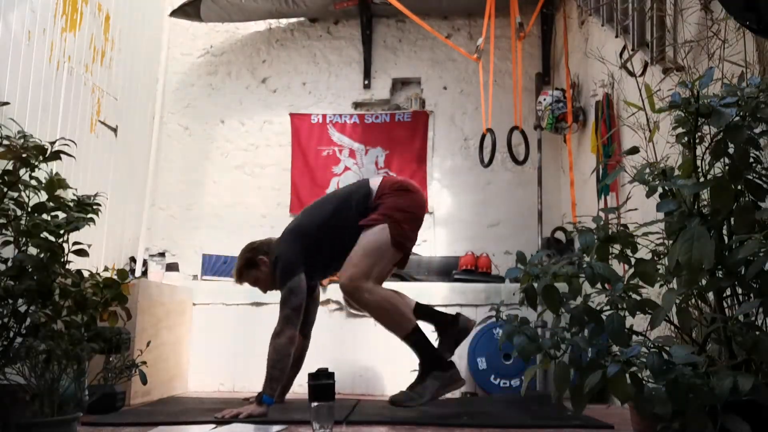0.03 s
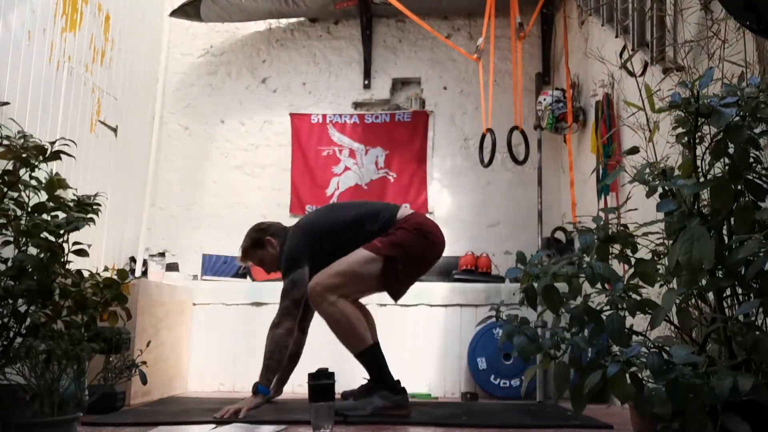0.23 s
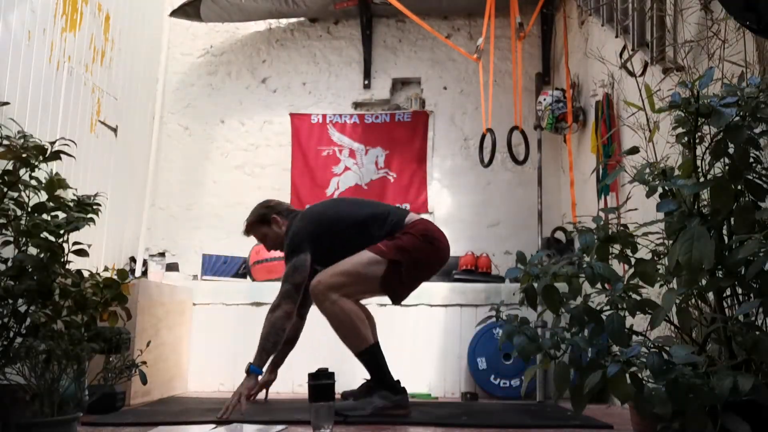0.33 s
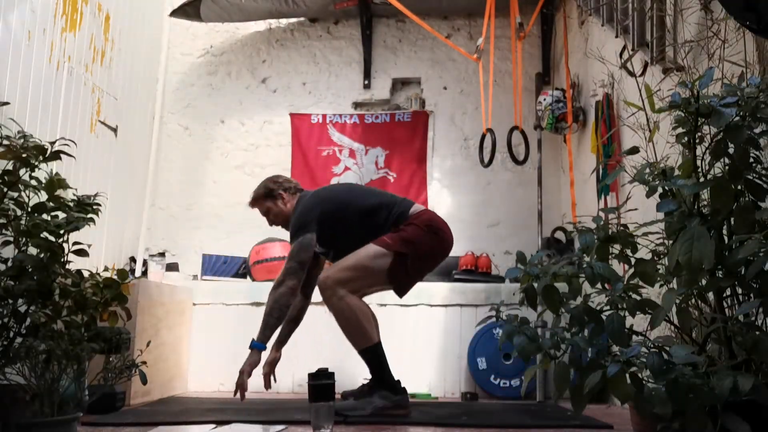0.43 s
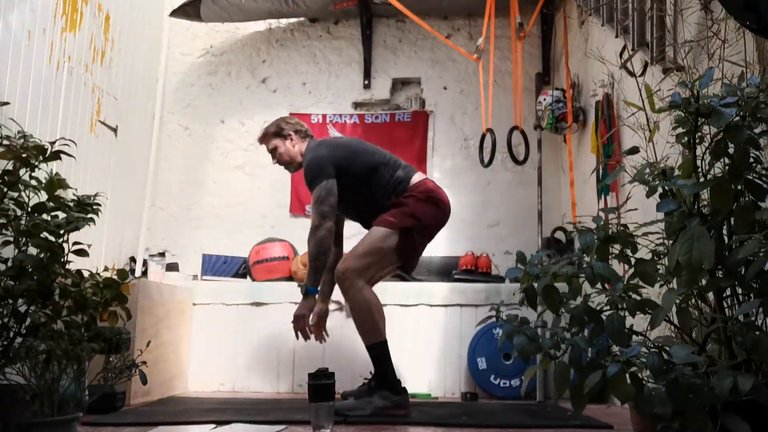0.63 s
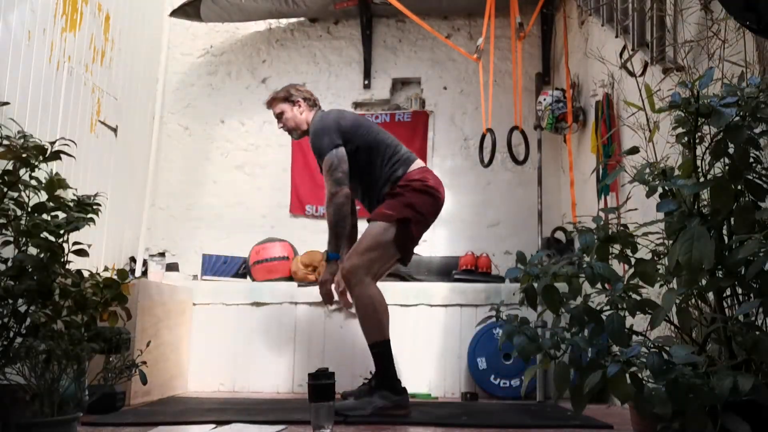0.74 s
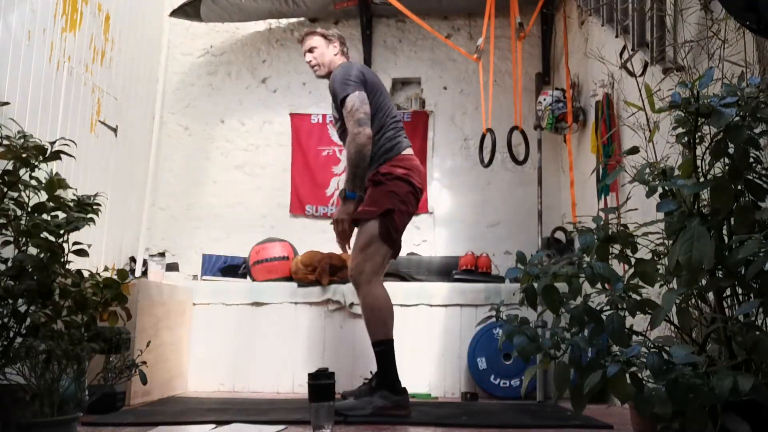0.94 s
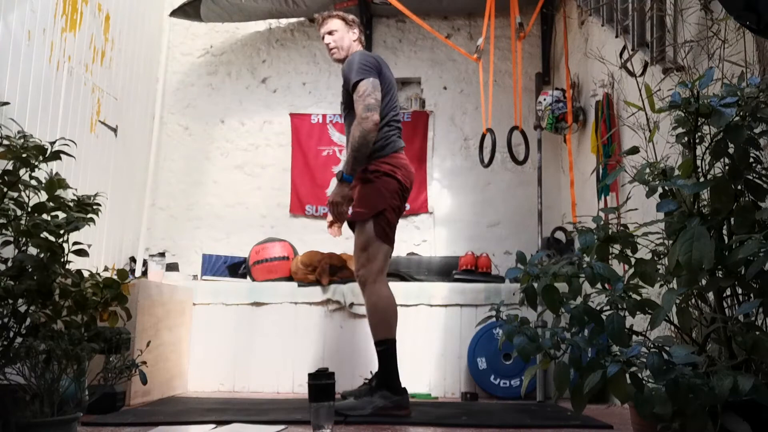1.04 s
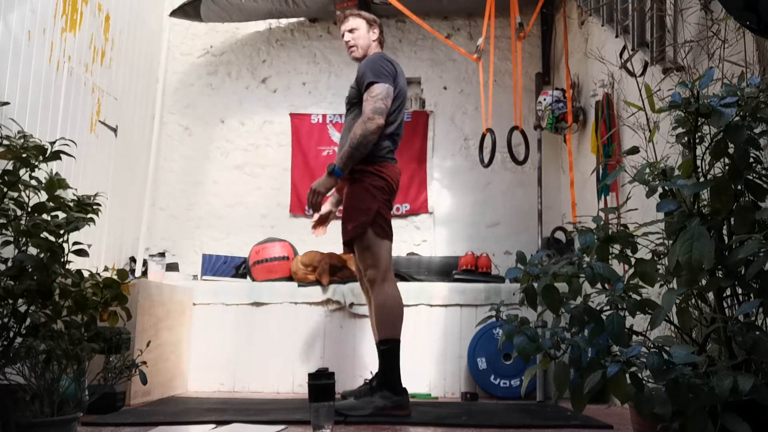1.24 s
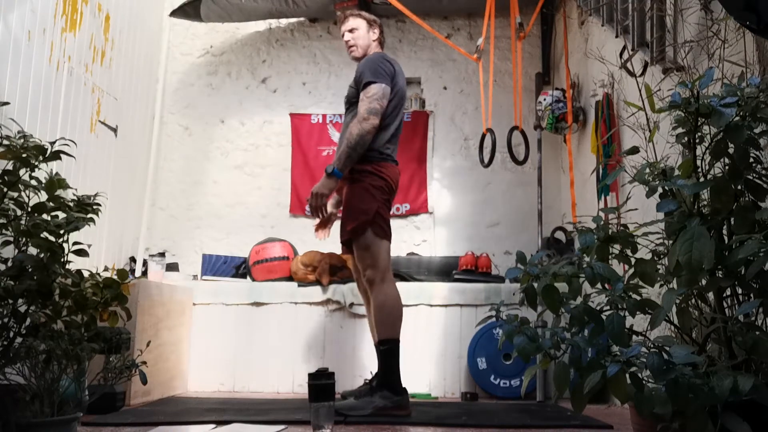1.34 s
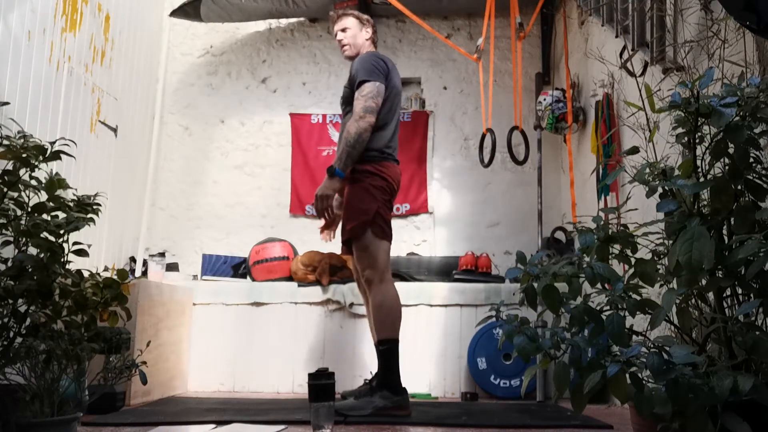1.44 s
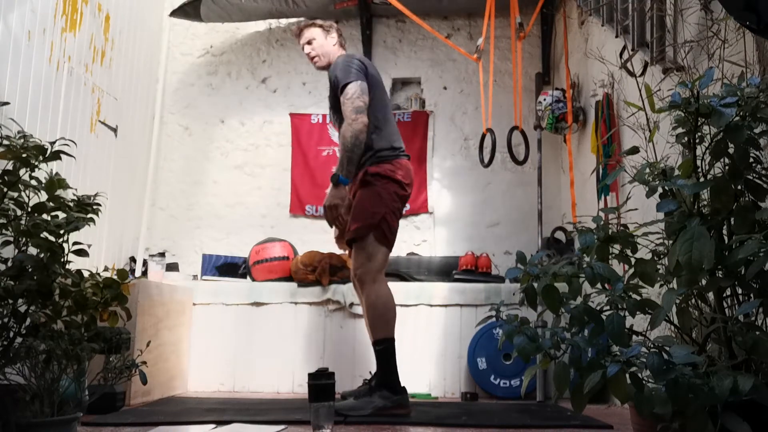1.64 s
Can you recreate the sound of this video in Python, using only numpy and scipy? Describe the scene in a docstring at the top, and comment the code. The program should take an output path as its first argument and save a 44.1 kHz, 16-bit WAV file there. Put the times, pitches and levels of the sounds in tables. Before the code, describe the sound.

Two shoes landing on a padded mat. A soft scuff and very faint taps open the first 0.1 s; at about 0.22 s the soles slap down in a rapid, uneven cluster with gritty scuffing, and heel weight booms low through the floor near 0.3 s. The hard-walled yard rings about a third of a second. A barely audible scuff follows near 0.46 s, then only faint distant rumble, hiss and thin hum.

```python
"""Faint rumble, hiss and hum with a soft scuff, then two shoes land on a padded mat in a hard-walled yard room.
Light first contacts lead to sole slaps: a strike and a roll of small contacts, coloured by rubber, foam and mat.
Heels load the floor, whose decaying sine modes boom; soles scuff as filtered noise and grains.
A phone with two unlike microphones listens: the left one is dull above 8 kHz."""
import sys
import numpy as np
from scipy import signal
from scipy.fft import rfft, irfft, next_fast_len
from scipy.io import wavfile
from scipy.ndimage import uniform_filter1d

SR = 44100
rng = np.random.default_rng(int(sys.argv[2]) if len(sys.argv) > 2 else 0)


def persist_wave(psi):
    """Save psi, clipped to +-1, as 16-bit WAV."""
    counts = np.round(np.clip(psi, -1, 1) * 32767).astype(np.int16)
    wavfile.write(sys.argv[1], SR, np.atleast_2d(counts).T)


def undo_db(level):
    """Turn decibels back into plain size, where 20 dB means ten times bigger."""
    steps = np.asarray(level, float) / 20
    return 10 ** steps


N = 74970


def unit(x):
    """Scaled to rms 1."""
    return x / np.sqrt(np.mean(x ** 2) + 1e-20)


def along(points, hz):
    """Interpolates (Hz, value) points on a log frequency axis."""
    f, v = np.transpose(points)
    return np.interp(np.log(hz + 1), np.log(f + 1), v)


def filtered(x, response):
    """x times a response of frequency, zero-padded."""
    m = 2 * next_fast_len(x.shape[-1] // 2 + 4096)
    hz = np.fft.rfftfreq(m, 1 / SR)
    return irfft(rfft(x, m) * response(hz), m)[..., :x.shape[-1]]


def causal(db):
    """Minimum-phase response with these levels, by folding the cepstrum."""
    cepstrum = irfft(db * np.log(10) / 20)
    half = len(cepstrum) // 2
    fold = np.r_[1, np.full(half - 1, 2), 1, np.zeros(half - 1)]
    return np.exp(rfft(cepstrum * fold))


# left-right likeness: (frequency [Hz], correlation [0-1])
LIKENESS = [(60, 0.99), (130, 0.98), (290, 0.87), (640, 0.63), (1400, 0.19), (15000, .01)]


def at_ports(pair):
    """Two unrelated signals become left and right, alike in the bass only."""
    def mix(hz):
        angle = np.arccos(np.clip(along(LIKENESS, hz), -1, 1)) / 2
        return np.array([np.cos(angle), np.sin(angle)])
    common, opposed = filtered(pair, mix)
    return np.array([common + opposed, common - opposed])


def grains(shape, per_s, spread_db):
    """Sparse random clicks of uneven size."""
    hit = rng.random(shape) < per_s / SR
    size_db = spread_db * rng.exponential(size=shape)
    return hit * undo_db(size_db) * rng.standard_normal(shape)


# distant rumble spectrum: (frequency [Hz], relative density [dB per Hz])
RUMBLE_SPECTRUM = [(12, -48), (20, -19), (45, -17), (62, -9), (81, 0), (139, -13), (300, -13), (325, -18.5),
                   (440, -20), (640, -26), (740, -21), (810, -24), (980, -34), (1510, -33), (2400, -40),
                   (3300, -56), (5500, -120)]
RUMBLE_DB, PATCHY_DB = -56, -1.24


def rumble():
    """Distant rumble: noise whose level wanders in random patches of time and frequency."""
    z = signal.stft(rng.standard_normal((2, N + 1024)), nperseg=1024)[2]
    field = rng.standard_normal(z.shape[1:])
    for axis in (0, 1):
        field = uniform_filter1d(field, size=8, axis=axis)
    pair = signal.istft(z * undo_db(PATCHY_DB * unit(field)), nperseg=1024)[1][:, :N]
    return undo_db(RUMBLE_DB) * unit(filtered(at_ports(pair), lambda hz: undo_db(along(RUMBLE_SPECTRUM, hz))))


# faint hiss spectrum: (frequency [Hz], relative density [dB per Hz])
HISS_SPECTRUM = [(1470, -30), (2500, 0), (3350, -6), (3610, -6), (3750, -8), (4150, -6), (5340, -5),
                 (7610, -14), (8090, -8), (8870, -10), (10700, -4), (11700, -7), (15600, -12)]
HISS_DB = -75.99


def hiss():
    """Steady filtered noise, independent at each microphone."""
    noise = rng.standard_normal((2, N))
    return undo_db(HISS_DB) * unit(filtered(noise, lambda hz: undo_db(along(HISS_SPECTRUM, hz))))


HUM_HZ, HUM_WIDTH_HZ, HUM_DB = 722, 12, -79.5  # width at half amplitude


def hum():
    """A faint fuzzy tone: noise through one narrow resonance."""
    line = lambda hz: 1 / (1 + (2 * (hz - HUM_HZ) / HUM_WIDTH_HZ) ** 2)
    return undo_db(HUM_DB) * unit(filtered(at_ports(rng.standard_normal((2, N))), line))


# sliding soles: (start [s], length [s], level before sag [dB])
SCUFF_SLIDES = [(-0.01, 0.22, -52.5), (0.216, 0.16, -44.5), (0.461, 0.17, -70.5)]
# grit spectrum: (frequency [Hz], relative density [dB per Hz])
GRIT_SPECTRUM = [(1500, -4.5), (3000, -6), (5500, -11), (7000, -5.5), (7800, -10), (8800, -3), (9800, -7),
                 (10700, -5), (12000, -10.5), (15500, -16.5)]
SCUFF_RISE_S, SCUFF_T60_S, SCUFF_SAG_DB = 0.006, 0.2, 11
GRAINS_PER_S, GRAIN_SPREAD_DB, GRAIN_SHARE = 2800, 7.0, 0.83  # share: rms over smooth noise


def scuffs():
    """Dense grit under a sliding sole: quick rise, slow sag, release when it stops."""
    t = np.arange(N) / SR
    shape = np.zeros(N)
    for s, length, db in SCUFF_SLIDES:
        rise = np.clip((t - s) / SCUFF_RISE_S, 0, 1)
        sag_db = SCUFF_SAG_DB * np.clip((t - s) / length, 0, 1)
        release_db = 60 * np.maximum(t - s - length, 0) / SCUFF_T60_S
        shape += rise * undo_db(db - sag_db - release_db)
    clicks = unit(grains((2, N), GRAINS_PER_S, GRAIN_SPREAD_DB))
    grit = rng.standard_normal((2, N)) + GRAIN_SHARE * clicks
    return shape * unit(filtered(grit, lambda hz: undo_db(along(GRIT_SPECTRUM, hz))))


# reverberation: (frequency [Hz], t60 [s])
WALL_DECAY = [(100, 0.68), (250, 0.25), (500, 0.29), (1000, 0.33), (2000, 0.34), (5000, 0.35),
              (12000, 0.054)]
WET_DB = -1  # tail over direct sound


def walls(x):
    """Direct sound plus a fresh noise tail in which each frequency dies at its own speed."""
    hz, t, z = signal.stft(rng.standard_normal((2, SR // 2)), SR, nperseg=256)
    decay = undo_db(-60 * t / along(WALL_DECAY, hz)[:, None])
    tail = at_ports(signal.istft(z * decay, SR, nperseg=256)[1])
    tail = undo_db(WET_DB) * tail / np.linalg.norm(tail[0])
    direct = np.arange(tail.shape[1]) == 0
    return signal.fftconvolve(x, tail + direct, axes=1)


def add(out, sound, s):
    """Mixes a sound in at time s."""
    part = out[:, max(round(s * SR), 0):][:, :sound.shape[-1]]
    part += sound[..., :part.shape[-1]]


# sole contacts: (time [s], strength before SLAP_GAIN_DB [dB],
# dullness above 1 kHz [dB per octave], fullness below 1 kHz [dB per octave])
SOLE_CONTACTS = [(0.0, -50.5, 4, 7.5), (0.0207, -37.5, 5.5, -1), (0.037, -46.5, 20.5, 7),
                 (0.056, -48, 20, -4), (0.075, -43.5, 14, -9.5), (0.2228, -20, 1, -2.5),
                 (0.2255, -16, 0, -2.5), (0.2335, -16.5, 0, -2.5), (0.243, -23.5, 3.5, 0),
                 (0.254, -23, -1, -2), (0.268, -34.5, 2, 0.5), (0.279, -24.5, 4.5, -2),
                 (0.288, -23.5, 1, 4.5)]
# rubber on foam: (frequency [Hz], relative density [dB per Hz])
SOLE_SPECTRUM = [(53, -31), (90, -15), (264, -8.5), (463, -5), (538, -1), (922, -7), (1610, -13.5),
                 (1760, -21.5), (2710, -18), (3080, -28), (5000, -32.5), (9050, -48.5), (15500, -46)]
# mat and wall resonances: (frequency before shift [Hz], width at half lift [Hz], lift [dB])
MAT_RESONANCES = [(270, 43, 4.5), (517, 34, 2.5), (613.4, 30, 3), (711, 51, 6), (936, 128, 7),
                  (1096, 240, 0.5), (1350, 25, 2), (1668, 120, -1), (2187, 90, 2), (2434, 70, 4.5)]
SLAP_GAIN_DB = 35.5
ROLL_T60_S, ROLL_PER_S, ROLL_DB, ROLL_SPREAD_DB = 0.016, 3000, -0.5, 2.64  # ROLL_DB: over the strike
SOFT_HZ = 2630  # foam rounds each strike off above this
MAT_SHIFT = 0.0053  # rms share by which the mat resonances vary at random from contact to contact


def slaps():
    """Each sole strikes, rolls down in small contacts, rings the mat and fills the room."""
    out, t = np.zeros((2, N)), np.arange(SR // 10) / SR
    for s, db, dull, full in SOLE_CONTACTS:
        strike = filtered(1.0 * (t == 0), lambda f: causal(-10 * np.log10(1 + (f / SOFT_HZ) ** 4)))
        roll = grains((2, len(t)), ROLL_PER_S, ROLL_SPREAD_DB) * undo_db(-60 * t / ROLL_T60_S)
        roll = at_ports(roll / np.linalg.norm(roll[0]))
        blow = strike + undo_db(ROLL_DB) * roll
        shift = 1 + MAT_SHIFT * rng.standard_normal(len(MAT_RESONANCES))

        def colour(f):
            ring_db = sum(lift / (1 + (2 * (f - centre * m) / width) ** 2)
                          for (centre, width, lift), m in zip(MAT_RESONANCES, shift))
            dull_db = -dull * np.log2(np.maximum(f / 1000, 1))
            full_db = -full * np.log2(np.clip(f / 1000, 0.15, 1))
            return causal(along(SOLE_SPECTRUM, f) + ring_db + dull_db + full_db)
        add(out, undo_db(db + SLAP_GAIN_DB) * walls(filtered(blow, colour)), s)
    return out


# body weight arriving: (time [s], strength [dB])
HEEL_LOADS = [(0.021, -62), (0.15, -55.5), (0.244, -31.5), (0.293, -17.5)]
# floor modes: (frequency [Hz], level relative to strength [dB], t60 [s])
FLOOR_MODES = [(49, -5, .55), (74.8, 1.5, 0.2), (82, -2, 0.083), (112, -10, 0.52), (195.1, -12, 0.32),
               (263.6, -9, 0.13), (300.3, -12, 0.22)]
LOAD_CYCLES = 0.5  # build-up time constant, in cycles of each mode


def heels():
    """The weight pushes the floor, whose modes ring alike at both microphones."""
    out, t = np.zeros((2, N)), np.arange(SR // 2) / SR
    boom = np.zeros(len(t))
    for hz, level, t60 in FLOOR_MODES:
        build_up = 1 - np.exp(-t * hz / LOAD_CYCLES)
        boom += undo_db(level - 60 * t / t60) * build_up * np.sin(2 * np.pi * hz * t)
    for s, db in HEEL_LOADS:
        add(out, undo_db(db) * boom, s)
    return out


def scene():
    """Background, feet and floor."""
    return rumble() + hiss() + hum() + scuffs() + slaps() + heels()


def low_pass(x):
    """Removes everything above the highest recorded frequency."""
    return signal.sosfilt(signal.butter(12, 15800, fs=SR, output="sos"), x)


# microphone mismatch: (frequency [Hz], left over right [dB])
MIC_MISMATCH = [(160, 0), (320, -4), (660, -7.5), (950, -4), (2200, -6), (3500, -1), (5700, -1.5),
                (7500, 2), (8200, -20), (11800, -18), (15000, -15)]


def record(dry):
    """Each microphone has its own colour; the summed power gain of the pair is the same at all frequencies."""
    def mics(hz):
        ratio = undo_db(along(MIC_MISMATCH, hz))
        return np.array([ratio, np.ones_like(hz)]) * np.sqrt(2 / (1 + ratio ** 2))
    mix = filtered(dry, mics)
    return low_pass(mix)


dry = scene()
out = record(dry)
persist_wave(out)
```